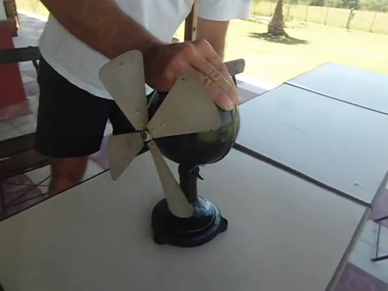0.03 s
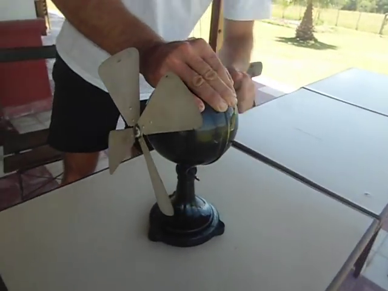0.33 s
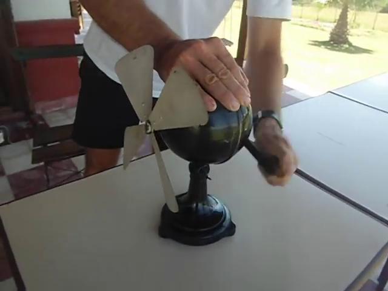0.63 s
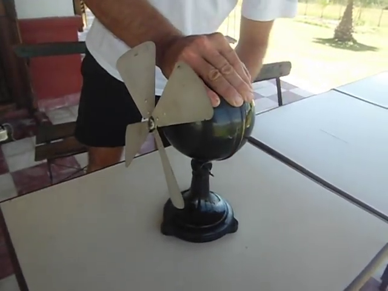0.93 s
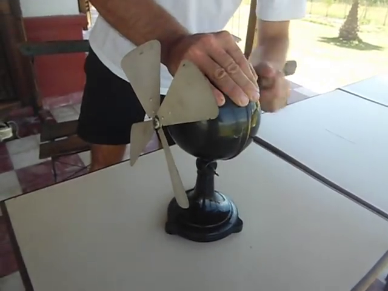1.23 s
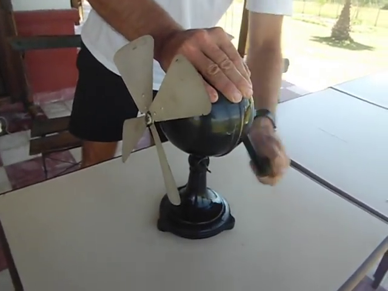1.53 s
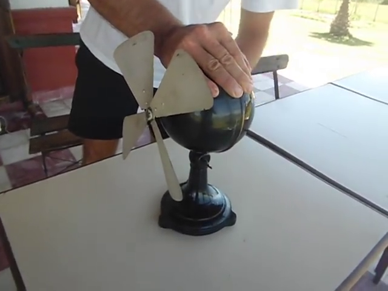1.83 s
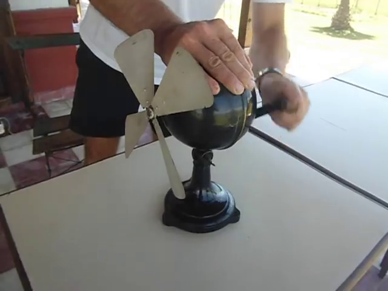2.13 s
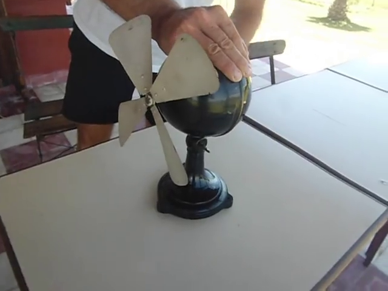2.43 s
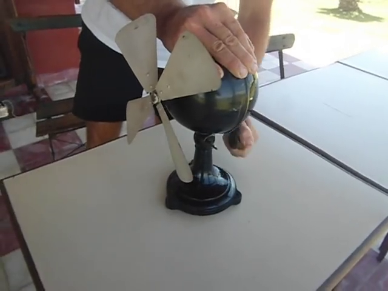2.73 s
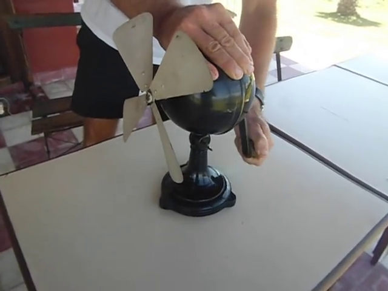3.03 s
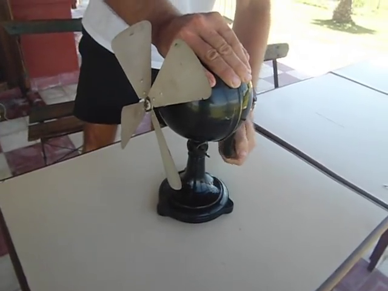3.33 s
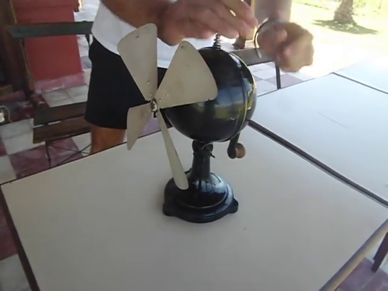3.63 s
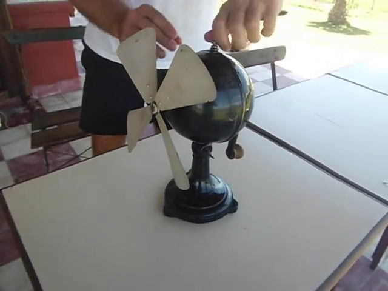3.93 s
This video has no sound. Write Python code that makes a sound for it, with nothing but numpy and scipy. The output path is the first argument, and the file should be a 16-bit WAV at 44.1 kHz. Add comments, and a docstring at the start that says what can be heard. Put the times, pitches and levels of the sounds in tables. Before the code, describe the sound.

Sharp, bright ratchet clicks come from a wind-up fan cranked close by under a porch roof, over a faint low rumble. They slow as the spring tightens, the base bumps the table, and light finger taps follow.

```python
"""A spring-driven metal fan is wound by hand on a table under a porch roof.
From the start the pawl, a small catch, snaps over the ratchet teeth above a low rumble and outdoor air.
The clicks come quickly at first, then slower as the spring tightens, and fingers touch the housing.
Around the last clicks the iron base rocks, knocks on the table and settles.
Finally the hands let go with a few faint taps."""
import sys
import numpy as np
from scipy import signal
from scipy.fft import rfft, irfft
from scipy.io import wavfile

SR = 44100
rng = np.random.default_rng(int(sys.argv[2]) if len(sys.argv) > 2 else 0)


def persist_wave(psi):
    """Save psi, clipped to +-1, as 16-bit WAV."""
    counts = np.round(np.clip(psi, -1, 1) * 32767).astype(np.int16)
    wavfile.write(sys.argv[1], SR, np.atleast_2d(counts).T)


N = 176400  # 4 seconds


def amp(db):
    """Turns decibels into a number to multiply by."""
    return 10 ** (np.asarray(db) / 20)


def unit(x):
    """Scales a sound to a total energy of one."""
    return x / np.sqrt(np.sum(x ** 2) + 1e-20)


def read(points, hz):
    """Reads between the rows of a table, on a logarithmic pitch scale."""
    f, value = np.transpose(points)
    return np.interp(np.log(hz + 1), np.log(f + 1), value)


def add(mix, s, sound):
    """Mixes a sound in at s seconds."""
    part = mix[max(round(s * SR), 0):][:len(sound)]
    part += sound[:len(part)]


def fade(t, fade_s):
    """Dies away by 60 dB in fade_s seconds, the "fade time"."""
    return np.exp(-np.log(1000) * t / np.maximum(fade_s, 1e-4))


def colour(x, db_of_hz):
    """Turns each pitch up or down without smearing the sound back in time."""
    size = 2 * len(x)
    log_gain = np.log(amp(db_of_hz(abs(np.fft.fftfreq(size, 1 / SR)))))
    response = np.exp(np.conj(signal.hilbert(log_gain)))
    return np.fft.ifft(np.fft.fft(x, size) * response).real[:len(x)]


def noise(tone):
    """Steady noise with the given tone and an average power of one."""
    gain = amp(read(tone, np.fft.rfftfreq(N, 1 / SR)))
    return np.sqrt(N) * unit(irfft(rfft(rng.standard_normal(N)) * gain, N))


# The pawl drops off a tooth: (time [s], level [dB], brightness [score], middle fade time [s])
CLICKS = [(-.008, -19.0, -0.5, 0.021), (0.0511, -21, -8.5, 0.02), (0.105, -19, 9.5, 0.021),
          (0.158, -19.5, 8, 0.019), (0.2185, -22, -21, 0.02), (0.282, -21, 3, 0.018),
          (0.34, -20.5, -4, 0.019), (0.3918, -21, -9.5, 0.01), (0.456, -21, -6, 0.027),
          (0.512, -20.5, -1, 0.018), (0.5625, -21, -2.5, 0.017), (0.6232, -18.5, 5.5, 0.017),
          (0.6839, -20, 20, 0.013), (0.746, -19.5, -10.5, 0.014), (0.8022, -20, 14, 0.018),
          (0.8543, -19.5, 10, 0.013), (0.916, -21.5, -11, 0.012), (0.97, -20, 10, 0.016),
          (1.0241, -19, 0, 0.019), (1.0777, -20.5, 4, 0.013), (1.1313, -20, -0.5, 0.014),
          (1.1899, -20.5, 10, 0.016), (1.2531, -20, 4.8, 0.022), (1.3054, -23, -9, 0.018),
          (1.3703, -22.5, -10, 0.01), (1.4283, -20, -5, 0.015), (1.484, -20.5, -9, 0.023),
          (1.5425, -21, -8.5, 0.018), (1.5981, -21.5, 14, 0.02), (1.662, -20.5, -10, 0.017),
          (1.7263, -21, -12, 0.018), (1.7801, -21.5, -3, 0.013), (1.8474, -21.5, -17, 0.012),
          (1.9097, -21, 2, 0.021), (1.9706, -22, 0, 0.0086), (2.037, -19.5, 14, 0.019),
          (2.1086, -22.5, 6.5, 0.023), (2.2073, -22.5, -13, 0.013), (2.3535, -23.5, 13, 0.011),
          (2.4536, -24.5, -6, 0.016), (2.5766, -24, -10, 0.013), (2.736, -25.5, 12, 0.015)]

def ratchet(size=4096, lead_in=2205, early_s=0.0007):
    """Each tooth snaps the steel, the housing answers, and the porch returns a bright wash."""
    out = np.zeros(lead_in + N)  # room for a click just before time zero
    t = np.arange(size) / SR
    for s, db, brightness, fade_s in CLICKS:
        snap, snap_for_echo = steel_snap(t, brightness, fade_s)
        body = housing(t) * amp(-0.37 * s)  # a little weaker as winding goes on
        echo = signal.fftconvolve(snap_for_echo + body, porch())
        start = lead_in / SR + s - early_s
        add(out, start, amp(db) * (snap + body))
        add(out, start, amp(db) * echo)
    return out[lead_in:]


# The tone of the steel pawl and wheel: (pitch [Hz], relative level [dB])
STEEL_TONE = [(500, -23.5), (2000, -22.5), (4700, -12.5), (5600, -4.5), (7200, -5), (10000, -0.5),
              (13200, -4), (15000, -6.5), (17000, -23.5), (17900, -44)]

def steel_snap(t, brightness, fade_s, level_db=22, rise_s=0.0013, hold_s=0.0023, split_hz=8800):
    """Steel chatters on steel. Gives the snap and a smoother version for the porch to echo."""
    def tone(f):
        treble = np.clip(np.log2(f / 7000 + 1e-6), 0, 1)
        return read(STEEL_TONE, f) + 0.31 * brightness * treble

    chatter = amp(1.5 * np.interp(t, t[::16], rng.standard_normal(len(t[::16]))))
    hiss = rng.standard_normal(len(t))
    stray = rng.standard_normal((2, len(STEEL_PEAKS), 1))
    rise = np.minimum(t / rise_s, 1) ** 2
    fading_s = np.maximum(t - hold_s, 0)
    highs = irfft(rfft(hiss) * (np.fft.rfftfreq(len(t), 1 / SR) > split_hz))
    lows = hiss - highs
    # The highs ring longer than the lows.
    burst = highs * fade(fading_s, fade_s * 1.35) + lows * fade(fading_s, fade_s / 1.35)
    snap = colour(burst * chatter * rise, lambda f: tone(f) + steel_ring(f, stray))
    smooth = colour(signal.unit_impulse(len(t)), lambda f: tone(f) + 0.46 * steel_ring(f, stray))
    return amp(level_db) * unit(snap), amp(level_db) * unit(smooth)


# Where the steel rings, and the dips between: (pitch [Hz], width [Hz], boost [dB])
STEEL_PEAKS = [(3500, 1100, -3), (5620, 260, 4.8), (5920, 220, -5), (6370, 240, 4.5), (7150, 380, 8.5),
               (7780, 240, -3.5), (8070, 150, 4), (8680, 440, 5), (9250, 220, -7), (10000, 180, 6.5),
               (10310, 120, -5), (10580, 150, 4), (11950, 240, 5), (13400, 400, 4), (13900, 160, -8),
               (15200, 300, -7)]

def steel_ring(f, stray):
    """The steel's boost in dB at pitches f; each tooth shifts the peaks a little."""
    hz, width, db = np.transpose(STEEL_PEAKS)[:, :, None]
    hz = hz * (1 + 0.004 * stray[0])
    db = db + 1.5 * stray[1]
    return (db / (1 + (2 * (f - hz) / width) ** 2)).sum(0)


# The tone of the hollow motor housing: (pitch [Hz], relative level [dB])
HOUSING_TONE = [(120, -18), (350, -1.5), (650, 0.5), (1100, -4.5), (2100, 1.5), (5000, -11)]
# The notes it rings at: (pitch [Hz], typical level [dB])
HOUSING_NOTES = [(1850, -9.5), (2220, -10.5), (2480, -14.5), (3030, -14)]

def housing(t, puff_db=2.5):
    """Each snap shakes the housing differently: a hollow puff and a few faint notes."""
    burst = rng.standard_normal(len(t)) * fade(t, fade_s=0.044)
    puff = unit(colour(burst, lambda f: read(HOUSING_TONE, f)))
    ring = sum(amp(db) * rng.standard_normal() * unit(fade(t, 0.045) * np.sin(2 * np.pi * hz * t))
               for hz, db in HOUSING_NOTES)
    return amp(puff_db) * puff + ring


# How long sound lingers under the porch roof: (pitch [Hz], fade time [s])
PORCH_FADES = [(150, 0.46), (600, 0.23), (2000, 0.34), (6000, 0.28), (10000, 0.3), (15000, 0.16)]

def porch(size=16384, first_echo_s=0.012, last_echo_s=0.029):
    """Close echoes and a short, smooth tail, drawn afresh on each call."""
    hz, t, bands = signal.stft(rng.standard_normal(size), SR, nperseg=256)
    bands = bands * fade(t, read(PORCH_FADES, hz)[:, None])
    tail = unit(signal.istft(bands, SR, nperseg=256)[1])
    progress = np.clip((np.arange(size) / SR - first_echo_s) / (last_echo_s - first_echo_s), 0, 1)
    swell = np.sqrt(progress * (1 - progress))
    echoes = amp(-18) * unit(rng.standard_normal(size) * swell)
    add(echoes, s=0.008, sound=amp(-18.5) * tail)
    return colour(echoes, lambda f: -2 * np.log2(np.maximum(f, 700) / 7000))  # softer toward the top


# The notes of the table and iron base: (pitch [Hz], level [dB], fade time [s])
TABLE_NOTES = [(115.3, 0, 0.15), (175, -2, 0.073), (346, 1, 0.14), (440, -11, 0.009), (614, 4.5, 0.049),
               (1120, -6.5, 0.016), (1285, -1.5, .022), (2200, -7.5, 0.03)]

def table_ring(t):
    """When jolted, the table and base ring with several short notes at once."""
    return sum(amp(db) * fade(t, fade_s) * np.sin(2 * np.pi * hz * t) for hz, db, fade_s in TABLE_NOTES)


def table_shake(size=16000, shake_db=-36.5):
    """Every click shakes the table slightly."""
    out = np.zeros(N)
    ring = table_ring(np.arange(size) / SR)
    for s, db, _, _ in CLICKS:
        add(out, s, amp(db + shake_db) * ring)
    return out


# The tone of the outdoor background: (pitch [Hz], relative level [dB])
AIR_TONE = [(59, -2), (100, -3.5), (161, -28.5), (360, -23.5), (692, -21), (2490, -27.5), (8600, -34.5),
            (9800, -27.5), (18000, -47.5)]

def outdoor_air(level_db=-64.5):
    """A faint, steady hush from outside."""
    return amp(level_db) * noise(AIR_TONE)


# The tone of the rumble: (pitch [Hz], relative level [dB])
RUMBLE_TONE = [(10, -5.5), (28, -1.5), (50, -9.5), (80, -15), (110, -7.5), (150, -15.5), (600, -31.5),
               (8000, -75)]
# How loud it is: (time [s], level [dB])
RUMBLE_LEVEL = [(0, -55), (1, -53.5), (2, -56), (2.4, -58), (2.9, -57.5), (3.3, -60.5), (4, -65)]

def crank_rumble():
    """A low rumble while the crank turns, easing when the winding stops."""
    level_db = np.interp(np.arange(N) / SR, *np.transpose(RUMBLE_LEVEL))
    return noise(RUMBLE_TONE) * amp(level_db)


# Bumps of the crank and hands: (time [s], level [dB], pitch [Hz], length [s])
BUMPS = [(0.229, -42, 52, 0.031), (1.102, -38.5, 28, 0.13), (1.632, -45, 199, 0.016),
         (1.885, -48.5, 176, 0.052), (1.941, -45, 170, 0.021), (3.434, -41.5, 42.6, 0.045),
         (3.558, -41, 39.6, 0.058)]

def soft_bumps():
    """Each bump is a low note that swells and sinks."""
    out = np.zeros(N)
    for s, db, hz, length in BUMPS:
        t = np.arange(0, length, 1 / SR)
        swell = np.sin(np.pi * t / length) ** 2
        add(out, s, amp(db) * swell * np.sin(2 * np.pi * (hz * t + rng.random())))
    return out


# Fingers on the housing and crank handle: (time [s], level [dB], centre pitch [Hz], fade time [s])
TAPS = [(1.893, -27.5, 740, 0.058), (1.948, -30, 520, 0.07), (2.166, -36, 915, 0.057),
        (2.758, -33, 150, 0.095), (2.858, -37, 185, 0.2), (3.112, -39, 3950, 0.038),
        (3.315, -35, 1080, 0.054), (3.33, -34.5, 5500, 0.012), (3.353, -42, 4500, 0.035),
        (3.38, -32, 12100, 0.014), (3.52, -33, 9600, 0.071), (3.535, -38.5, 5450, 0.04)]

def finger_taps(size=6000, db_per_octave=9, rise_s=0.0031):
    """Each touch is a short burst of noise, strongest around one pitch."""
    out, t = np.zeros(N), np.arange(size) / SR
    for s, db, hz, fade_s in TAPS:
        burst = rng.standard_normal(size) * np.minimum(t / rise_s, 1) * fade(t, fade_s)
        tap = colour(burst, lambda f: -db_per_octave * abs(np.log2((f + 20) / hz)))
        add(out, s, amp(db) * unit(tap))
    return out


# The rocking base lands on the table: (time [s], level [dB])
KNOCKS = [(2.5608, -38), (2.6463, -56.5)]

def base_knocks(size=16000, thud_s=0.00049, rattle_hz=(113, 800)):
    """The iron base thuds down, sets the table ringing and rattles briefly on it."""
    out, t = np.zeros(N), np.arange(size) / SR
    ring = table_ring(t)
    thud = amp(4) * np.exp(-t / thud_s) * t / thud_s * (2 - t / thud_s)
    band = signal.butter(2, rattle_hz, "bandpass", fs=SR, output="sos")
    for s, db in KNOCKS:
        rattle = signal.sosfilt(band, rng.standard_normal(size) * fade(t, fade_s=0.029))
        add(out, s, amp(db) * (ring + thud + amp(18) * unit(rattle)))
    return out


def scene():
    """Mixes the fan, its porch echoes and the outdoor air into one channel."""
    handling = table_shake() + base_knocks() + finger_taps()
    fan = ratchet() + handling + signal.fftconvolve(handling, porch())[:N]
    return (fan + crank_rumble() + soft_bumps() + outdoor_air())[None]


def record(dry, top_hz=18300, offset=0.01):
    """Cuts the very highest pitches and lifts the whole wave slightly off zero."""
    treble_cut = signal.firwin(255, top_hz, window=("kaiser", 9), fs=SR)
    return signal.oaconvolve(dry, treble_cut[None], "same") + offset


dry = scene()
out = record(dry)
persist_wave(out)
```